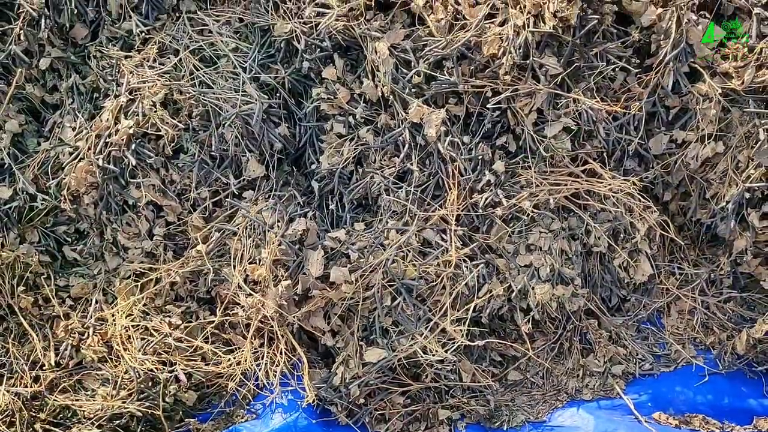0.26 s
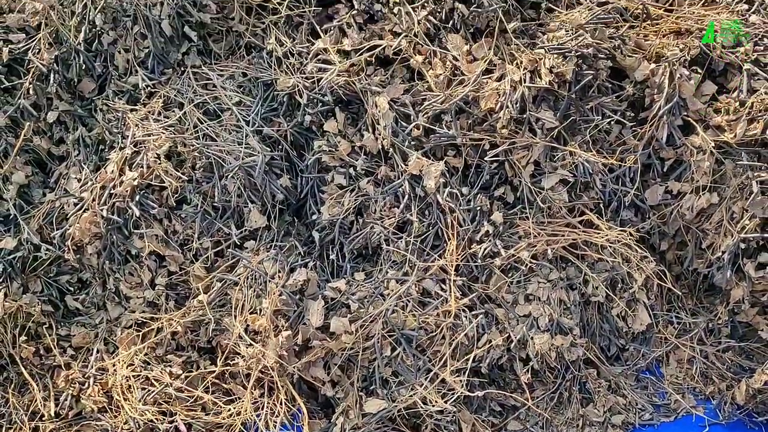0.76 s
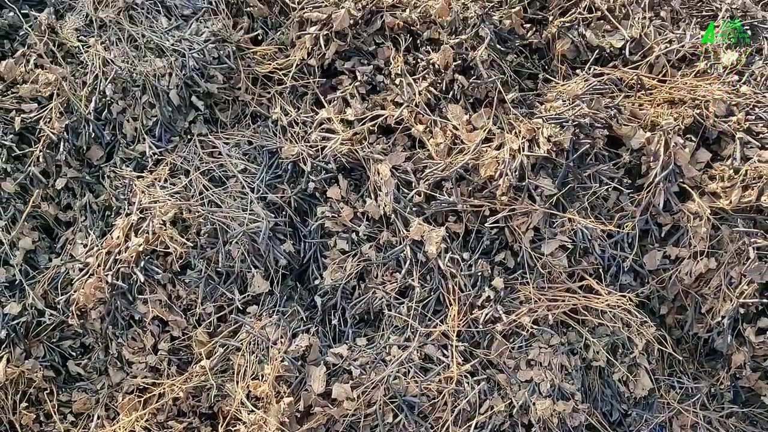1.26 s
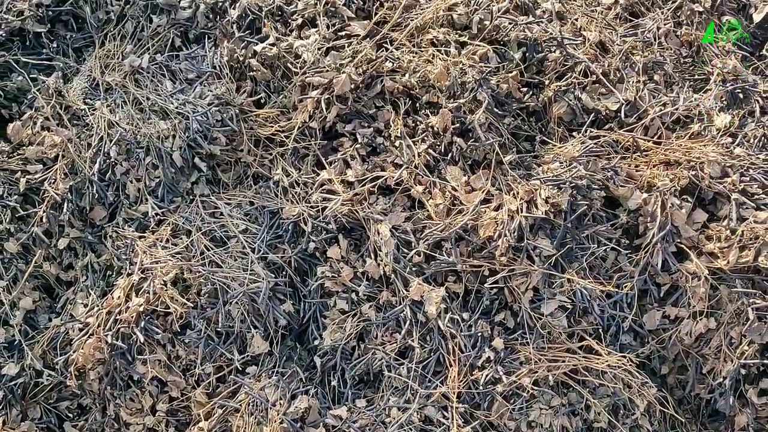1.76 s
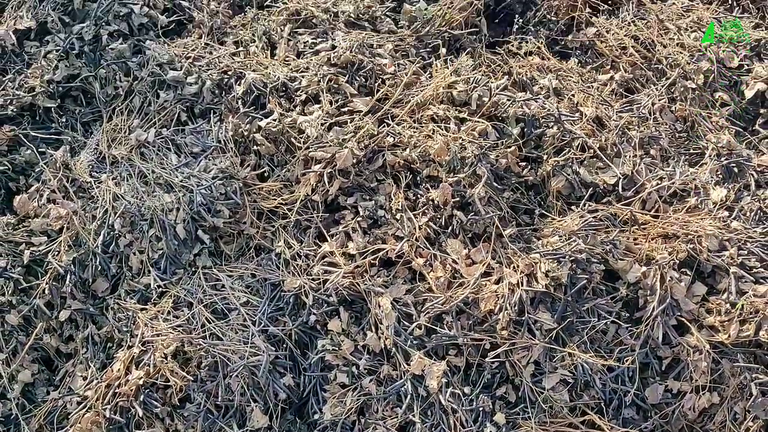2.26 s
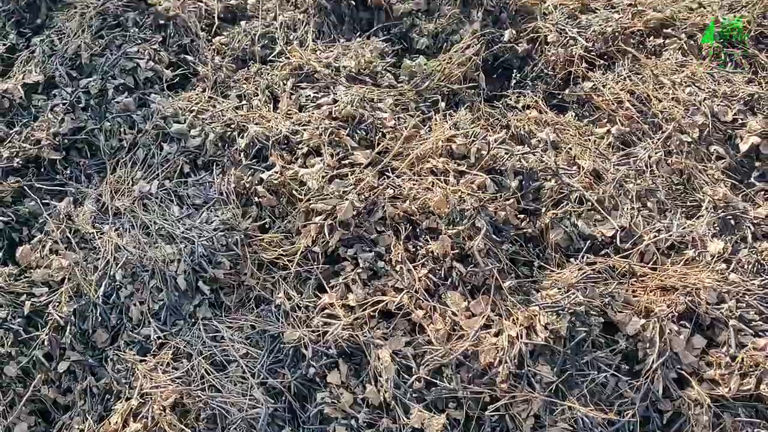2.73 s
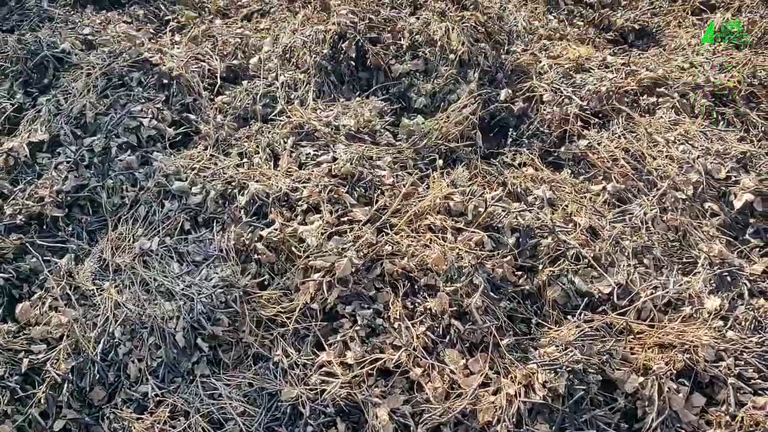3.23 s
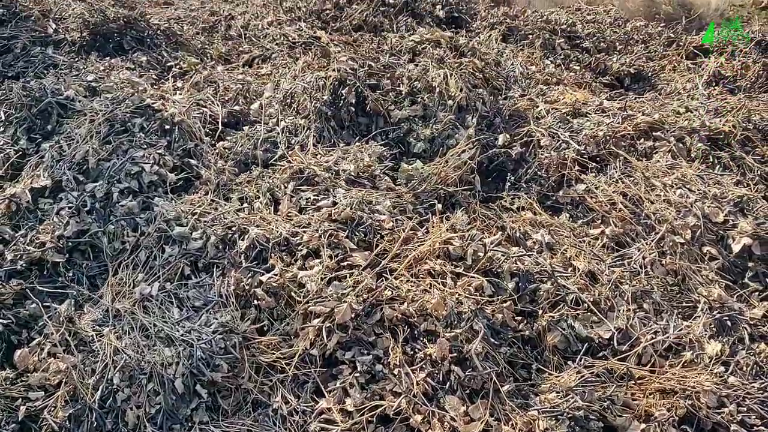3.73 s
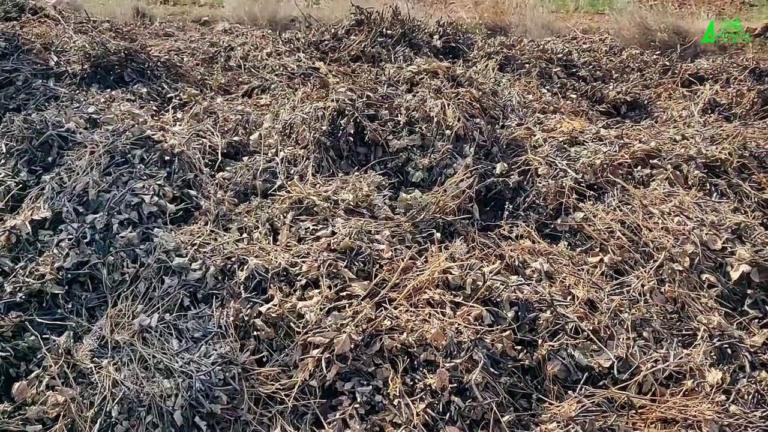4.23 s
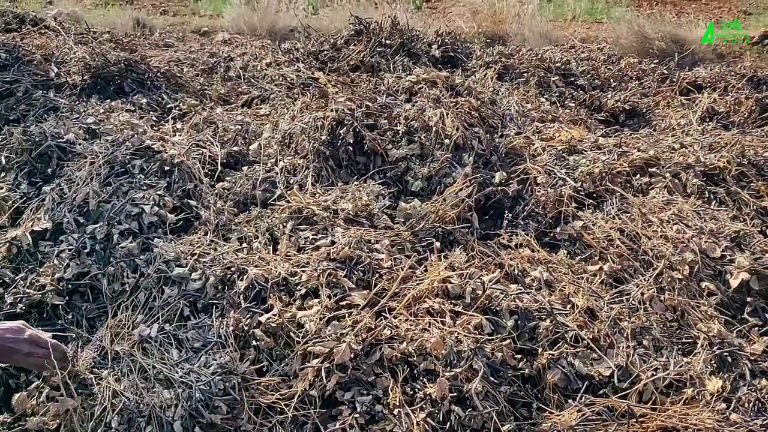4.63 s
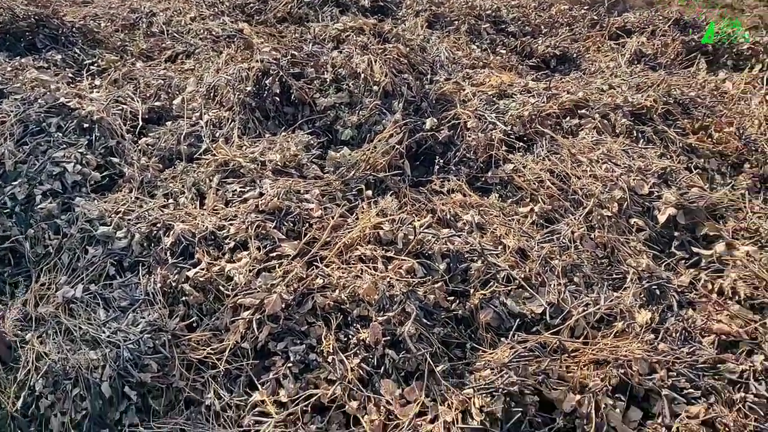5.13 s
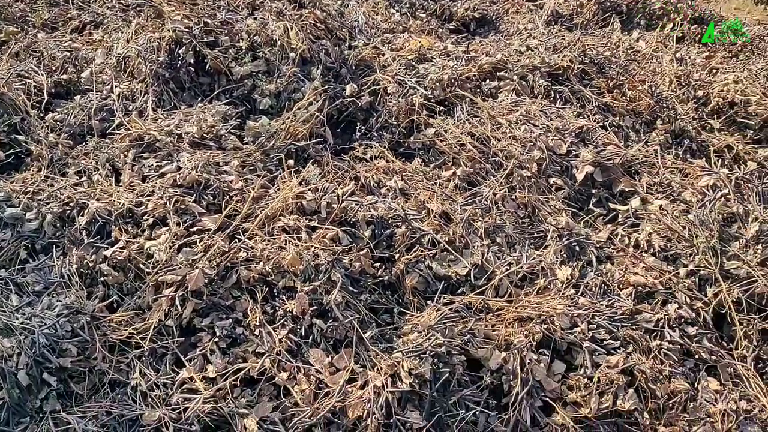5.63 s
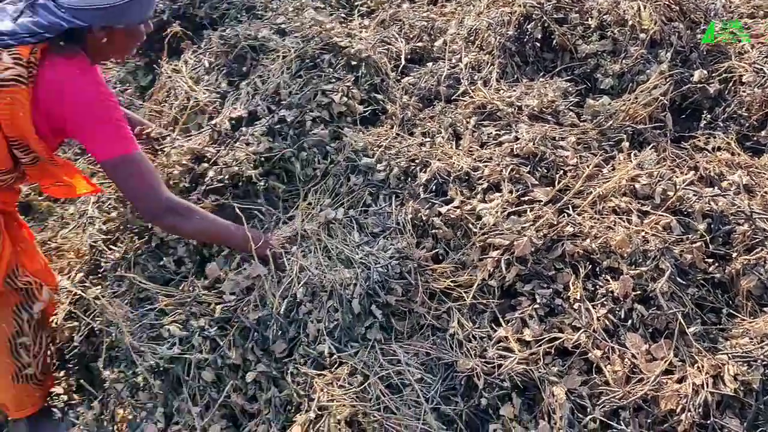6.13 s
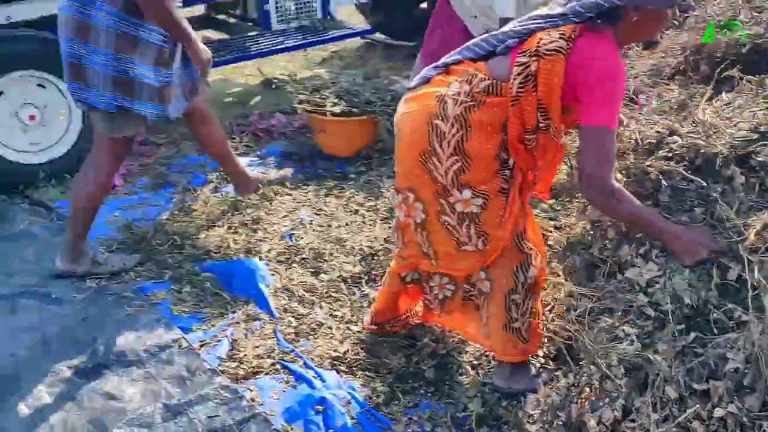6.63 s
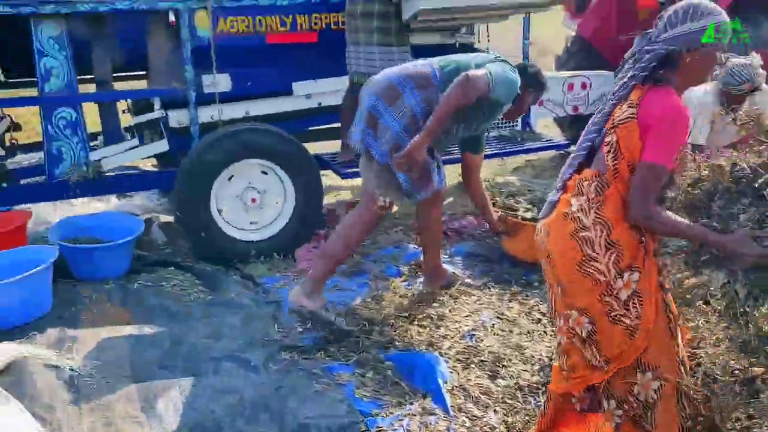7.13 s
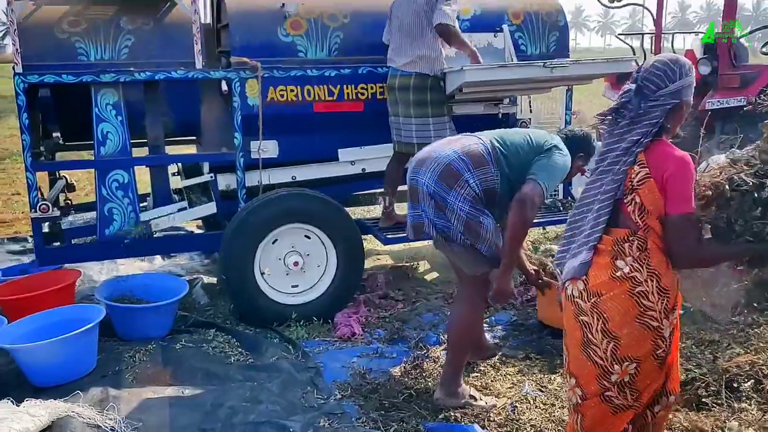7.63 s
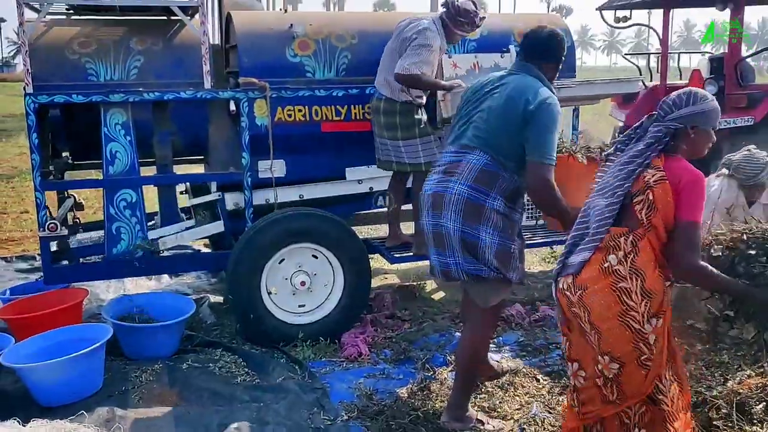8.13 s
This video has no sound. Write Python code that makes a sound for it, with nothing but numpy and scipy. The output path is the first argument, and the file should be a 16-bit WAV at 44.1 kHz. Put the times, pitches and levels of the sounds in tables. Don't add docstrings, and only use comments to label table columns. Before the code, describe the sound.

A tractor-driven threshing machine runs at constant speed in an open field. A deep throbbing blower and engine drone lies under a shaking sieve that rattles and knocks about eight times a second, with dense chaff hiss. Soft crop bundles thud occasionally; a brief low wind buffet comes just before five seconds. Near the end the handheld stereo microphone turns towards the machine and the clatter and hiss become clearer.

```python
import sys
import numpy as np
from scipy import signal
from scipy.fft import rfft, irfft, dct, next_fast_len
from scipy.io import wavfile
from scipy.ndimage import uniform_filter1d, map_coordinates

SR = 44100
rng = np.random.default_rng(int(sys.argv[2]) if len(sys.argv) > 2 else 0)


def makeup_ratio(level_db):
    decades = np.asarray(level_db, float) / 20
    return 10 ** decades


def unload_audio(sound):
    columns = np.transpose(np.atleast_2d(sound))
    steps = np.round(np.clip(columns, -1, 1) * 32767)
    wavfile.write(sys.argv[1], SR, steps.astype(np.int16))


N = 369558

# start_s, facing [0 turned away, 1 facing]
TURN = [(0, .36), (.8, .3), (1, .22), (2.1, .2), (2.4, 0), (5.1, 0), (5.4, .1), (5.7, 0), (6.02, 0),
        (6.15, .22), (6.36, .4), (6.55, .5), (6.75, 1), (8.38, 1)]
LAG_S = 15.5 / 44100
CRANK_S, FIRST_S = .261, .11
HISS_OPENS = .4


def unit(x):
    return x / np.sqrt(np.mean(x ** 2) + 1e-20)


def along(rows, hz):
    f, *cols = np.transpose(rows)
    return np.array([np.interp(np.log(hz + 1), np.log(f + 1), c) for c in cols])


def curves(rows):
    s, *cols = np.transpose(rows)
    return [np.interp(np.arange(N) / SR, s, c) for c in cols]


def wobble(rate):
    knots = rng.standard_normal(int(N * rate / SR) + 4)
    return map_coordinates(knots, [np.arange(N) * rate / SR])


def rush(colour, patchy_db, facing):
    # pitch_hz, turned_away [0-1], facing [0-1]
    alike = [(60, .88, .98), (300, .95, .99), (600, .84, .97), (950, .62, .85), (1300, .65, .3),
             (1580, .97, .25), (1950, .2, .2), (2550, .82, .45), (3000, .2, .1), (4300, .15, .1),
             (6000, .52, .1), (8500, .2, .05), (10000, .02, .02)]
    # pitch_hz, extra_phase_rad
    bend = [(1000, 0), (1550, -.3), (1800, .3), (2200, 1.2), (2600, .55), (2900, .7), (3300, 2.1),
            (4700, 2.2), (5900, 2.7), (7000, 1.4)]
    size = next_fast_len(N)
    hz = np.fft.rfftfreq(size, 1 / SR)
    z = signal.stft(rng.standard_normal((4, N)), nperseg=512)[2]
    field = uniform_filter1d(rng.standard_normal(z.shape[1:]), 6, axis=0)
    field = uniform_filter1d(field, 10, axis=1)
    patchy = signal.istft(z * makeup_ratio(patchy_db * unit(field)), nperseg=512)[1]
    noise = rfft(patchy, size)
    angle = np.arccos(np.clip(along(alike, hz), 0, 1)) / 2
    mid, side = noise[:2] * np.cos(angle), noise[2:] * np.sin(angle)
    late = np.exp(-2j * np.pi * hz * LAG_S - 1j * along(bend, hz)[0])
    away = [mid[0] + side[0], (mid[0] - side[0]) * late]
    towards = [mid[1] + side[1], mid[1] - side[1]]
    ports = irfft(np.array(away + towards) * makeup_ratio(along(colour, hz)), size)[:, :N]
    return np.sqrt(1 - facing) * unit(ports[:2]) + np.sqrt(facing) * unit(ports[2:])


def wind():
    # start_s, level_db
    gusts = [
        (0, -55.5),
        (4.55, -42),
        (4.72, -53),
        (4.8, -45),
        (4.89, -32),
        (4.97, -42),
        (8.38, -54),
    ]
    low = signal.butter(2, [30, 130], "bandpass", fs=SR, output="sos")
    return makeup_ratio(curves(gusts)[0]) * unit(signal.sosfilt(low, rng.standard_normal(N)))


def bundles():
    # start_s, level_db, pitch_hz, length_s
    landings = [
        (.7, -38, 185, 0.069),
        (1.353, -39, 530, 0.056),
        (1.451, -42, 180, 0.046),
        (2.15, -46, 503, 0.035),
        (3.77, -40, 280, 0.078),
        (4.301, -39, 370, .05),
        (6.404, -41, 365, 0.022),
        (6.5, -43.5, 1040, .07),
        (6.78, -41, 185, .05),
    ]
    out, t = np.zeros(N), np.arange(-SR // 4, SR // 4) / SR
    for s, db, hz, length in landings:
        band = signal.butter(2, [hz / 1.2, hz * 1.3], "bandpass", fs=SR, output="sos")
        puff = unit(signal.sosfilt(band, rng.standard_normal(len(t))))
        out[int(s * SR) - SR // 4:][:len(t)] += makeup_ratio(db) * puff * np.exp(-(t / length) ** 2)
    return out


def drive():
    # start_s, blade_passes_hz
    speed_rows = [(0.0, 46.769), (0.7, 46.76), (1.4, 46.736), (2.1, 46.763), (2.8, 46.812), (3.5, 46.808),
                  (4.2, 46.782), (4.9, 46.772), (5.6, 46.8), (6.3, 46.823), (7.0, 46.733), (7.7, 46.646),
                  (8.38, 46.731)]
    # multiple, level_db, unsteadiness_db
    blower_orders = [(1, -31, 0), (2, -30, -0.2), (3, -45, 1), (4, -59, -4), (5, -47.5, 2),
                     (6, -66.5, -1.5), (7, -49, 1.5), (8, -54, 2.5), (9, -63, 3), (11, -60.5, -2)]
    # multiple of the firing rate, level_db
    engine_orders = [(1, -50), (2, -42), (3, -44), (4, -46), (5, -54), (17 / 3, -57), (12, -59)]
    belt = 22.81 / 46.79
    speed = curves(speed_rows)[0]
    late = [[0], [1]] * (1.6 - 1.2 * curves(TURN)[0]) * LAG_S * speed
    turns = np.cumsum(speed) / SR - late
    blades = 2 * np.pi * (turns + .392)
    firing = 2 * np.pi * (belt * turns + .225)
    out = np.zeros((2, N))
    for k, db, loose_db in blower_orders:
        out += makeup_ratio(db + 3 + loose_db * wobble(2.5)) * np.cos(k * blades + 2.3)
    for k, db in engine_orders:
        out += makeup_ratio(db + 3 + .8 * wobble(2)) * np.cos(k * firing + 1.6 - .7 * k * k)
    return out


def strokes():
    # start_s, extra_lift_db
    clumps = [
        (.635, 2),
        (1.157, -3),
        (3.12, 1.5),
        (3.896, 3),
        (5.066, 1.5),
        (5.589, 0.5),
        (7.159, 2.2),
        (7.42, -1),
        (7.563, -3),
        (8.2, -2.5),
    ]
    return_s, slack_s = .136, .004
    forward_db, return_db, scatter_db = 3.5, 2, 0.13
    turn = np.arange(int(N / SR / CRANK_S) + 1) * CRANK_S + FIRST_S
    s = np.ravel([turn, turn + return_s], "F")
    db = np.resize([forward_db, return_db], 2 * len(turn))
    chance = rng.standard_normal((len(s), 2))
    db = db + scatter_db * chance[:, 0]
    for when, extra_db in clumps:
        db[np.argmin(np.abs(s - when))] += extra_db
    return s + slack_s * chance[:, 1], db


def thrown(s, db, rise, fall):
    kicks = np.bincount((s * SR).astype(int), np.maximum(makeup_ratio(2 * db) - 1, 0), N)[:N]
    t = np.arange(SR // 8) / SR
    shape = np.exp(-t / fall) - np.exp(-t / rise)
    return np.abs(signal.oaconvolve(kicks, shape / shape.max())[:N])


def knocks(s, db):
    # pitch_hz, level_db, t60_s
    frame = [(677.5, -6, 0.063), (922, -1.5, 0.1), (1168, -9.5, 0.066)]
    level_db, facing_db, late_s = -43, 7, .006
    out, t = np.zeros(N + SR), np.arange(SR // 8) / SR
    hz, mode_db, t60 = np.transpose(frame)[:, :, None]
    chance = rng.standard_normal((len(s), 2, len(frame), 1))
    for when, lift_db, (loud, pitch) in zip(s, db, chance):
        decay = makeup_ratio(mode_db + 2 * loud - 60 * t / t60)
        ring = decay * np.sin(2 * np.pi * hz * (1 + .015 * pitch) * t)
        soft_start = 1 - np.exp(-t / 0.0026)
        out[int((when + late_s) * SR):][:len(t)] += makeup_ratio(lift_db) * ring.sum(axis=0) * soft_start
    facing = curves(TURN)[0]
    at = np.arange(N) - [[0], [1]] * (1 - facing) * LAG_S * SR
    return makeup_ratio(level_db + facing_db * facing) * map_coordinates(out, [at], order=1)


def rumble(throw, feed, facing):
    # pitch_hz, level_db per Hz
    colour = np.array([(15, -30), (32, -10), (45, -0.5), (60, 0), (100, 8), (160, -5), (185, 2), (215, -4),
                       (300, -1), (420, -2.5), (600, -43)])[:, [0, 1, 1, 1, 1]]
    level = makeup_ratio(-38.5 + 0.26 * feed) * np.sqrt(1 + 0.19 * throw)
    return level * rush(colour, patchy_db=0.75, facing=facing)


def rattle(throw, feed, flutter, load_db, facing):
    # pitch_hz, left_away_db, right_away_db, left_facing_db, right_facing_db
    colour = [(248, -103, -98, -93.5, -92), (383, -66.5, -71, -70.5, -71), (531, -66.5, -66, -77.5, -75.5),
              (684, -69.5, -68, -65, -64.5), (813, -77.5, -71, -70, -69.5), (920, -71.5, -72.5, -65, -66),
              (1243, -68.5, -69, -70.5, -70.5), (1654, -73.5, -73, -68.5, -74),
              (1943, -75, -72.5, -77, -73), (2354, -76.5, -73.5, -72, -73), (2730, -78.5, -77, -78, -75.5),
              (3414, -79.5, -79.5, -74, -72.5), (4346, -75, -74, -74, -68), (5200, -100, -100, -100, -100)]
    level_db = -38 - 0.5 * facing + .6 * load_db
    level = makeup_ratio(level_db + .6 * flutter + 0.44 * feed) * np.sqrt(1 + .9 * throw)
    return level * rush(colour, patchy_db=1.18, facing=facing)


def hiss(throw, feed, flutter, load_db, facing):
    # pitch_hz, left_away_db, right_away_db, left_facing_db, right_facing_db
    colour = [(3550, -100, -100, -100, -86), (4740, -77, -72, -75.5, -67), (5620, -65.5, -67.5, -66.5, -65),
              (6390, -60.5, -65.5, -61.5, -66), (7380, -70, -65, -69, -64.5),
              (8510, -81, -64.5, -77.5, -60), (9010, -92, -67.5, -120, -65), (9650, -140, -77.5, -140, -71),
              (10400, -140, -87, -140, -83), (11600, -112, -84.5, -105, -78.5),
              (13500, -100, -80.5, -93, -79), (14300, -101, -85.5, -93, -80.5),
              (14500, -108, -84.5, -120, -76.5), (15800, -110, -82, -120, -84.5)]
    swell_db, swell_late_s = -0.14, 0.033
    opened = np.clip(facing / HISS_OPENS, 0, 1) ** 3
    since = np.arange(N) / SR - FIRST_S - swell_late_s
    level_db = -31.5 + 2 * opened + 1.2 * load_db
    level_db = level_db + swell_db * np.cos(2 * np.pi * since / CRANK_S)
    level_db = level_db + 0.23 * feed + 0.36 * wobble(14) + 0.6 * flutter
    return makeup_ratio(level_db) * np.sqrt(1 + 0.33 * throw) * rush(colour, patchy_db=0.99, facing=opened)


def thresher():
    # start_s, load_db
    load = [(0, 0), (.5, -1.7), (1, -0.1), (1.3, -0.76), (2.1, -0.5), (2.6, 0.6), (2.9, -0.1), (3.5, 1),
            (4, -.5), (4.45, 1), (5.2, 0.5), (5.9, 0.45), (6.3, 2), (6.8, 0), (7.3, 0.5), (7.9, 0),
            (8.38, 0)]
    load_db, facing = curves(load)[0], curves(TURN)[0]
    s, db = strokes()
    throw, feed = thrown(s, db, rise=0.006, fall=0.012), wobble(12)
    flutter = wobble(35)
    out = rumble(throw, feed, facing)
    out = out + rattle(throw, feed, flutter, load_db, facing)
    out = out + hiss(throw, feed, flutter, load_db, facing)
    return out + knocks(s, db)


def scene():
    return drive() + thresher() + wind() + bundles()


def coarse_frames(x, size=1024, offset=459, count=8):
    # pitch_hz, left_or_mid_db per Hz, right_or_side_db per Hz
    steps = [(170, -76, -74), (500, -83, -82), (1300, -74.5, -78), (1600, -71.5, -74), (1800, -78, -78),
             (2100, -75, -74.5), (2900, -74.5, -76), (3300, -74, -74.5), (4000, -72.5, -72.5),
             (5200, -68.5, -68.5), (7000, -65.5, -65.5), (8300, -72, -74), (10300, -76, -75),
             (10900, -82, -78), (11400, -92, -83), (12000, -94, -82), (14200, -94, -84.5),
             (14800, -84, -81.5)]
    # turned_away_hz, facing_hz
    joint_hz = [6890, 2950]
    # pitch_hz, level_db
    masked_rows = [(170, -40), (300, -23), (500, -17), (800, -15), (1300, -10), (1600, -7), (2600, -7),
                   (3500, -9), (4500, -14)]
    half, window = size // 2, signal.windows.kaiser_bessel_derived(2 * size, 4 * np.pi)
    hops = np.pad(x, ((0, 0), (2 * size - offset, 3 * size)))
    hops = hops[:, :hops.shape[1] // size * size].reshape(2, -1, size)
    frames = np.concatenate([hops[:, :-1], hops[:, 1:]], axis=2) * window
    a, b, c, d = np.split(frames, 4, axis=2)
    folded = np.concatenate([-c[..., ::-1] - d, a - b[..., ::-1]], axis=2)
    z = dct(folded, type=4, norm="ortho")
    hz = (np.arange(size) + .5) * SR / 2 / size
    facing = np.interp(np.arange(z.shape[1]) * size / SR, *np.transpose(TURN))[:, None]
    joint = hz < np.where(facing < .5, *joint_hz)

    def swap(v):
        return np.where(joint, np.array([v[0] + v[1], v[0] - v[1]]) / np.sqrt(2), v)

    z = swap(z)
    drift = uniform_filter1d(rng.standard_normal(z.shape[:2] + (size // count,)), size=3, axis=1)
    drift_db = np.where(hz > 9500, 7.5, 4) * np.repeat(drift, count, axis=2)
    drift_db = drift_db + 3 * np.clip(facing / HISS_OPENS, 0, 1) ** 3
    step = makeup_ratio(along(steps, hz)[:, None] + drift_db) * np.sqrt(SR / 2)
    strength = np.sqrt(np.mean((z / step).reshape(2, -1, size // count, count) ** 2, axis=3))
    power = np.mean(z.reshape(strength.shape + (count,)) ** 2, axis=3)
    band_hz = hz[::count]
    masked = joint[:, ::count] & (power < power[::-1] * makeup_ratio(2 * along(masked_rows, band_hz)[0]))
    kept = (strength > np.where(band_hz > 9500, .5, .38)) & ~masked
    z = np.sign(z) * np.floor(np.abs(z) / step + .41) * step
    z = z * (hz < 15750) * np.repeat(kept, count, axis=2)
    y = dct(swap(z), type=4, norm="ortho")
    p, q = y[..., :half], y[..., half:]
    first = np.concatenate([q, -q[..., ::-1]], axis=2)
    second = np.concatenate([-p[..., ::-1], -p], axis=2)
    out = first[:, 1:] * window[:size] + second[:, :-1] * window[size:]
    return out.reshape(2, -1)[:, size - offset:][:, :N]


def top_cut(x):
    return signal.sosfilt(signal.butter(12, 15750, fs=SR, output="sos"), x)


def record(dry):
    mix = coarse_frames(dry)
    return top_cut(mix)


dry = scene()
out = record(dry)
unload_audio(out)
```